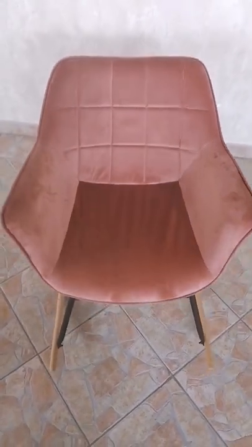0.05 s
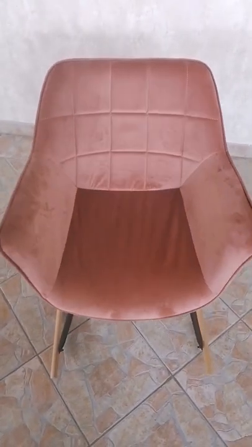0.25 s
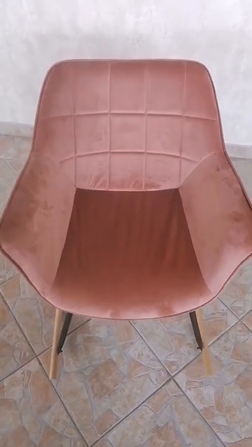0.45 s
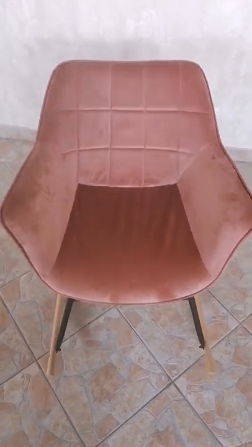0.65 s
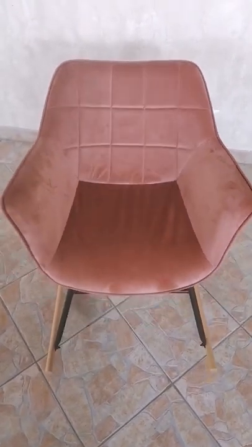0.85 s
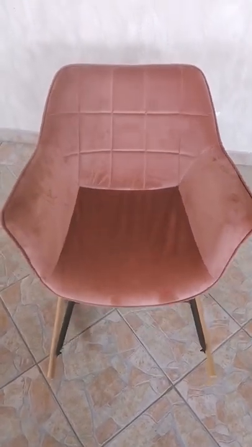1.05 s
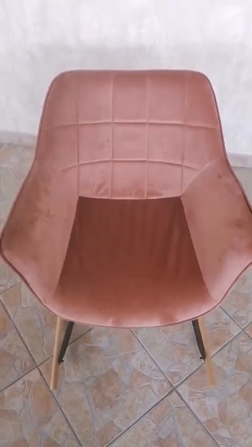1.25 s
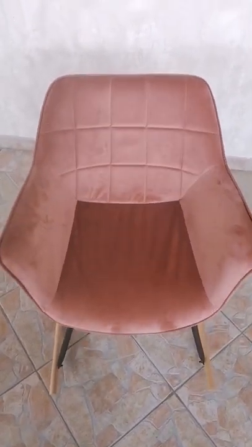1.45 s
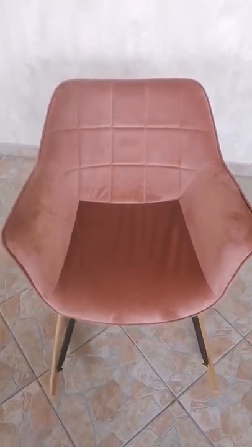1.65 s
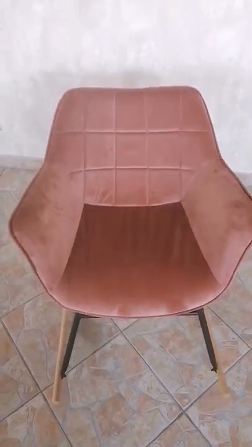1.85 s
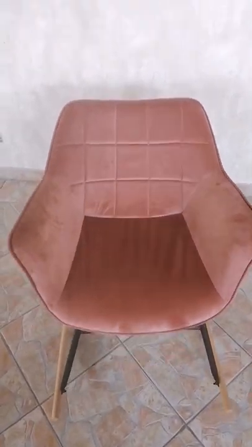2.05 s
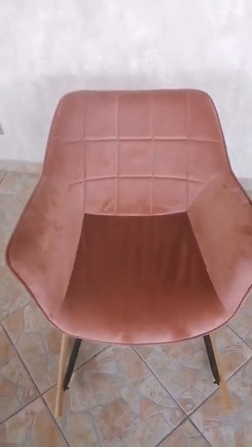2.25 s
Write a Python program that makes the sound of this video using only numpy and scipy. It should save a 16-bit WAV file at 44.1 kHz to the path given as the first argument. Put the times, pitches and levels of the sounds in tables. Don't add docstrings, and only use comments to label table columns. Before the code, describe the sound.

A chair rocks on rough tiles, close by in a small quiet room. After near silence, dull woody knocks cluster from 0.25 to 0.45 seconds, then pause. Heavier low thuds come around 0.8 to 1.0, more knocks at 1.2 to 1.55, and a hard cluster near 1.9, with a last bump at 2.25. Deep hums swell beneath, with faint hiss and slight cloth rustle and ticks late on.

```python
import sys
import numpy as np
from scipy import signal
from scipy.io import wavfile
from scipy.ndimage import uniform_filter1d

SR = 44100
rng = np.random.default_rng(int(sys.argv[2]) if len(sys.argv) > 2 else 0)


def generate_wav(sig):
    pcm = np.round(np.clip(np.atleast_2d(sig).T, -1, 1) * 32767).astype(np.int16)
    wavfile.write(sys.argv[1], SR, pcm)


def volts_from_decibels(level):
    exponent = np.asarray(level, float) / 20
    return 10 ** exponent


N = 101429

# (t/s, deep note level/dB, upper note level/dB)
SHELL_SWAY = [(0, -69, -53), (.05, -82, -78), (.17, -61, -67), (.21, -56, -67), (.25, -56, -56.5),
              (.3, -45, -51.5), (.45, -37.5, -44), (.74, -47, -63.5), (.95, -36.5, -80),
              (1.02, -43.5, -54.5), (1.24, -47.5, -72), (1.31, -57, -61), (1.54, -32.5, -43.5),
              (1.8, -45, -65), (1.97, -42.5, -63), (2.05, -48.5, -79), (2.1, -72, -78), (2.27, -56, -74)]
# (t/s, left over right/dB)
SWAY_PAN = [(0, 1), (.45, 1), (.7, 4.5), (.95, -0.5), (1.25, 0.5), (1.6, 2), (1.9, -1.5), (2.3, -2)]
# (t/s, level/dB)
BOARD_NOTE = [(0, -49.5), (.17, -81), (.3, -54), (.34, -49.5), (.44, -42), (.5, -66), (.56, -56),
              (.7, -98.5), (.82, -56), (.88, -33.5), (.928, -47.5), (.98, -45.5), (1.1, -55.5),
              (1.2, -72.5), (1.38, -58), (1.45, -46), (1.55, -56), (1.77, -69),
              (1.83, -51.5),
    (1.87, -53.5),
    (1.92, -41),
    (2.02, -61.5),
    (2.12, -74),
    (2.2, -90),
    (2.27, -65),
]
# (f/Hz, level/dB)
HISS_SPECTRUM = [(150, -11), (700, -11.5), (1300, -17), (3000, -20.5), (3600, -22.5), (7600, -29.5),
                 (8400, -36), (15400, -38.5)]
# (f/Hz, correlation)
HISS_LIKENESS = [(200, 0.98), (600, 0.11), (3000, 0.048), (7000, 0.074), (10000, 0.02), (13000, 1)]
# (f/Hz, left over right/dB)
HISS_TILT = [(300, -1), (1500, -1), (5000, .5), (9000, -6), (14000, -.5)]
# (t/s, level/dB)
ROLL_PRESSURE = [(0, -51), (.12, -78.5), (.2, -51), (.27, -61), (.3, -43), (.45, -58.5), (.52, -98),
                 (.72, -66), (.87, -41), (1.05, -60.5), (1.16, -70), (1.24, -50), (1.31, -57.5),
                 (1.43, -42.5), (1.58, -63), (1.74, -80.5), (1.92, -40), (2.14, -73)]
# (t/s, frame level/dB, board re frame/dB, runners re frame/dB)
RIDGES = [(.004, -61.5, 4, 1.5), (0.184, -62, -14, 11.5), (0.25, -57, 13, -3), (0.287, -47, 0.5, 4),
          (0.329, -46, 8.5, 0), (0.363, -47.5, -6, 2), (0.401, -50, -7, 3), (0.43, -60, -3, -9),
          (0.755, -55.5, -10, -7.5), (0.804, -43.5, 3.5, 1), (.845, -44, -6, 0.5), (0.863, -38.5, -14, -22),
          (0.907, -47.5, -5, -10), (.96, -43.5, 2, -9), (1.03, -54.5, -6, -18), (1.219, -52.5, -15, -8),
          (1.322, -43.5, -2.5, 4), (1.368, -47.5, -12, 4), (1.407, -45.5, -9, -10), (1.458, -47, -19, -9.5)]
# (t/s, frame level/dB, board re frame/dB, runners re frame/dB)
LATE_RIDGES = [
    (1.568, -50.5, -1, -39),
    (1.774, -52.5, -22, 2.5),
    (1.831, -50, -8, -2),
    (1.88, -41.5, 4, 0.5),
    (1.9, -41, -4, -11),
    (1.917, -40.5, -22, -36),
    (1.95, -59, -13, -4),
    (2.029, -48.5, -8, -6.5),
    (2.243, -50.5, -5, -0.5),
]
# (f/Hz, level/dB, t60/s, left-right phase/rad, left over right/dB)
BOARD_MODES = [(40.4, -9, 0.13, 0.55, 3.5), (106.2, -10, 0.17, 0.033, -8), (159.5, -6, 0.25, 0.028, -1)]
# (f/Hz, level/dB, t60/s, left-right phase/rad, left over right/dB)
FRAME_MODES = [(199.8, -13, 0.31, 0.1, 1.5), (215, -16.5, 0.23, 0.2, 0), (269, -9.5, 0.16, 0.11, -1.5),
               (292.5, -7, 0.064, 0.16, -6), (348.1, -11.5, 0.18, 0.47, -6),
               (382.6, -12.5, 0.24, 0.67, -3.5), (427.2, -10.5, 0.091, 0.69, -10.5)]
# (f/Hz, level/dB, t60/s, left-right phase/rad, left over right/dB)
RUNNER_MODES = [(466, -13.5, 0.1, 0.69, 0.7), (575.5, -6, 0.095, 1.66, 0.63), (683, -11, 0.063, 1.1, .5),
                (761.7, -9.5, 0.087, 2.04, 1), (882, -14.5, 0.067, 0.92, -1.2),
                (1168, -6, 0.024, 1.2, -1.4), (1733, -25, 0.087, 1.3, -1), (2373, -21, 0.039, 1.8, -1)]
# (f/Hz, t60/s)
ROOM_T60 = [(100, 0.82), (500, 0.17), (3000, 0.26)]
# (t/s, peak level/dB, f/Hz, t60/s)
CAUGHT_MODES = [(0.141, -62, 350.3, 0.19), (.184, -60.5, 477, 0.24), (0.193, -56.5, 344, 0.23),
                (.289, -53, 573, 0.16), (.295, -57, 307, 0.11), (0.322, -40.5, 148, 0.097),
                (.335, -52, 331, 0.11), (.355, -57, 597, 0.067), (0.371, -51, 254.6, 0.2),
                (.375, -53, 360.5, 0.18), (.397, -45, 365, 0.13), (0.426, -49, 262.4, .1),
                (0.459, -62, 375, 0.068), (.735, -59, 288, 0.25), (0.8, -43, 123, 0.2),
                (0.813, -55.5, 415, 0.15), (.842, -52.5, 547, 0.13), (0.844, -63, 1154, 0.14),
                (.86, -46, 410, 0.1), (.866, -42.5, 280, 0.13), (.866, -45, 198, .12),
                (0.902, -48, 294, 0.047), (.95, -44.5, 288, 0.098), (0.983, -52.5, 353.3, 0.29),
                (1.216, -59, 477, 0.14), (1.264, -57.5, 340, 0.16), (1.323, -54.5, 578, 0.25),
                (1.324, -54, 320, 0.19), (1.375, -54.5, 560, 0.12), (1.387, -47, 264, .2),
                (1.395, -55, 343, 0.14), (1.427, -46.5, 349, 0.17), (1.456, -52, 354, 0.094),
                (1.488, -47, 344, 0.086), (1.531, -59.5, 368, 0.21), (1.549, -55.5, 275.5, 0.14),
                (1.769, -59, 293, 0.16), (1.811, -46, 148, 0.14), (1.852, -56.5, 605, 0.16),
                (1.854, -53, 368, .1), (1.883, -51, 585, 0.15), (1.886, -46.5, 195, 0.24),
                (1.898, -47, 421, 0.14), (1.911, -38.5, 262.6, 0.097), (1.993, -43, 150, 0.14),
                (2.0, -41, 269, 0.083), (2.022, -48.5, 352.6, 0.13), (2.06, -60, 351.5, 0.33),
                (2.244, -57, 262, 0.17), (2.255, -51, 152, 0.11)]
# (peak t/s, rise/s, fall/s, level/dB, centre f/Hz, width/Hz)
BRUSHES = [
    (.848, .003, 0.066, -70.5, 1960, 1100),
    (1.91, 0.15, 0.18, -71, 2220, 2500),
    (1.93, 0.13, 0.19, -88, 10600, 3400),
    (2.17, 0.023, 0.081, -87, 10500, 1600),
    (2.165, 0.028, 0.067, -78, 5400, 6000),
]
# (t/s, level/dB, centre f/Hz, width/Hz)
CLOTH_TICKS = [
    (1.9, -62, 2800, 2000),
    (2.123, -70, 10500, 2500),
    (2.138, -70, 10500, 4000),
    (2.158, -60, 5500, 5000),
    (2.159, -68, 10600, 2500),
]

DEEP_HZ, UPPER_HZ, BOARD_HZ = 49.86, 75.05, 145.9
SHELL_WANDER_HZ, BOARD_WANDER_HZ = 0.89, 4
SWAY_LAG_RAD = 0.2
HISS_DB, RUMBLE_DB, RUMBLE_TOP_HZ = -73.5, -65, 161
GRIT_PER_S, GRIT_SPREAD_DB, GRIT_DB = 420, 3.5, -4
RIDGE_DB, UNEVEN_DB = -4.5, 1
RISE_S = 0.0036
SNAP = 1.44
NEIGHBOUR, SPLIT = 0.49, 0.0685
THUD_DB, THUD_HZ = -3.5, 278
ROOM_DB, ROOM_MONO_HZ = -13, 320
CATCH_RISE_CYCLES, CATCH_LAG_RAD, CATCH_PAN_DB = 2.73, 0.68, -3
WIDE_FROM_HZ = 317
DUCK_SHARE, DUCK_FROM_DB = 0.12, -57


def evened(x):
    return x / np.sqrt(np.mean(x ** 2) + 1e-20)


def read(points, hz):
    f, value = np.transpose(points)
    return np.interp(np.log(hz + 1), np.log(f + 1), value)


def curve(table, column=1):
    rows = np.array(table)
    return np.interp(np.arange(N) / SR, rows[:, 0], rows[:, column])


def band(x, hz, width_hz):
    return signal.lfilter(*signal.iirpeak(min(hz, SR / 2.2), hz / width_hz, SR), x)


def seat():
    out = np.zeros((2, N))
    notes = [(DEEP_HZ, SHELL_WANDER_HZ, curve(SHELL_SWAY), curve(SWAY_PAN)),
             (UPPER_HZ, SHELL_WANDER_HZ, curve(SHELL_SWAY, column=2), 0.3),
             (BOARD_HZ, BOARD_WANDER_HZ, curve(BOARD_NOTE), -0.5)]
    for hz, wander_hz, db, pan_db in notes:
        drift = uniform_filter1d(rng.standard_normal(N), size=3000)
        wander = evened(uniform_filter1d(drift, size=3000))
        phase = 2 * np.pi * np.cumsum(hz + wander_hz * wander) / SR
        lag = SWAY_LAG_RAD * evened(np.gradient(wander[::-1]))
        level = np.sqrt(2) * uniform_filter1d(volts_from_decibels(db), size=700)
        left = volts_from_decibels(pan_db / 2) * np.sin(phase + lag / 2)
        right = volts_from_decibels(-pan_db / 2) * np.sin(phase - lag / 2)
        out += level * np.array([left, right])
    return out


def hiss():
    frames, hz = N // 256 + 5, np.fft.rfftfreq(1024, 1 / SR)
    a, b, c, d, patches = rng.standard_normal((frames, 513, 5)).T
    patches = uniform_filter1d(patches, size=14, axis=0)
    patches = evened(uniform_filter1d(patches, size=8, axis=1))
    flicker = evened(uniform_filter1d(rng.standard_normal(frames), size=3))
    flicker = np.minimum(flicker, 1)
    same = np.clip(read(HISS_LIKENESS, hz), -1, 1)[:, None]
    left = a + 1j * b
    right = same * left + np.sqrt(1 - same ** 2) * (c + 1j * d)
    z = np.array([left, right]) * (hz > 120)[:, None]
    z *= volts_from_decibels(read(HISS_SPECTRUM, hz)[:, None] + 1.4 * patches + 0.7 * flicker)
    tilt = read(HISS_TILT, hz)
    z *= volts_from_decibels(np.array([tilt, -tilt])[:, :, None] / 2)
    treble = signal.istft(z * (hz > 1000)[:, None], nperseg=1024, noverlap=768)[1]
    noise = signal.istft(z, nperseg=1024, noverlap=768)[1][:, :N]
    return volts_from_decibels(HISS_DB) * noise / treble.std()


def rumble():
    noise = rng.standard_normal((3, N))
    sos = signal.butter(2, [15, RUMBLE_TOP_HZ], "band", fs=SR, output="sos")
    return volts_from_decibels(RUMBLE_DB) * evened(signal.sosfilt(sos, noise[0] + 0.72 * noise[1:]))


def ring(drive, hz, t60, lag, pan_db):
    t, side = np.arange(SR // 2) / SR, np.array([[1], [-1]])
    taps = np.sin(2 * np.pi * hz * t + side * lag / 2)
    for way in (1, -1):
        off, twist = rng.uniform(0.31, 1.855), rng.uniform(-0.12, 1)
        near_hz = hz * (1 + way * SPLIT * off)
        taps = taps + NEIGHBOUR * np.sin(2 * np.pi * near_hz * t + side * lag * twist)
    shape = volts_from_decibels(side * pan_db / 2 - 60 * t / t60) * (1 - np.exp(-t / RISE_S))
    return signal.oaconvolve(drive[None], shape * taps, axes=1)[:, :N]


def runners():
    rows = np.array(RIDGES + LATE_RIDGES)
    at, out = np.round(rows[:, 0] * SR).astype(int), np.zeros((2, N))
    grain_db = GRIT_SPREAD_DB * np.minimum(rng.exponential(1, N), 4)
    grit = evened((rng.random(N) < GRIT_PER_S / SR) * volts_from_decibels(grain_db))
    grit = grit * volts_from_decibels(curve(ROLL_PRESSURE) + GRIT_DB) / np.sqrt(SR / 100)
    t = np.arange(SR // 10) / SR
    # modes, level re frame/dB, grit level/dB, scuff decay/s
    parts = [(BOARD_MODES, rows[:, 2], 1, 0.022),
             (FRAME_MODES, 0, 0, 0.022),
             (RUNNER_MODES, rows[:, 3], -3.5, 0.056)]
    for modes, rel_db, grit_db, scuff_s in parts:
        scuff = np.exp(-t / scuff_s) + SNAP * np.exp(-t / RISE_S)
        scuff = scuff / np.sqrt(scuff_s * SR / 2)
        for hz, db, t60, lag, pan_db in modes:
            uneven_db = UNEVEN_DB * rng.standard_normal(len(rows))
            ridges = np.zeros(N)
            ridges[at] = volts_from_decibels(rows[:, 1] + RIDGE_DB + rel_db + uneven_db)
            scuffs = signal.oaconvolve(ridges, scuff)[:N]
            dulling_db = 10 * max(np.log2(hz / 1000), 0)
            drive = grit * volts_from_decibels(grit_db - dulling_db) + scuffs
            out += volts_from_decibels(db) * ring(drive * rng.standard_normal(N), hz, t60, lag, pan_db)
    return out


def thuds():
    rows = np.array(RIDGES + LATE_RIDGES)
    blows = np.zeros(N)
    sign = rng.choice([-1.0, 1.0], len(rows))
    blows[np.round(rows[:, 0] * SR).astype(int)] = volts_from_decibels(rows[:, 1] + THUD_DB) * sign
    u = 2 * np.pi * THUD_HZ * np.arange(SR // 10) / SR
    pulse = u ** 3 * (4 - u) * np.exp(-u) / 2
    return signal.oaconvolve(blows, pulse)[:N]


def room(x):
    taps = np.zeros((2, SR // 2))
    at = np.arange(200, SR // 2 - 20, 20)
    at = at + rng.integers(0, 20, (2, len(at)))
    np.put_along_axis(taps, at, rng.choice([-1., 1.], at.shape), 1)
    hz, t, z = signal.stft(taps, SR, nperseg=512)
    decay = volts_from_decibels(-60 * t / read(ROOM_T60, hz)[:, None])
    tail = signal.istft(z * decay, SR, nperseg=512)[1]
    tail = tail / np.linalg.norm(tail[0])
    wet = volts_from_decibels(ROOM_DB) * signal.fftconvolve(x.mean(0)[None], tail, axes=1)[:, :N]
    low = signal.butter(2, ROOM_MONO_HZ, "low", fs=SR, output="sos")
    return wet - signal.sosfiltfilt(low, wet - wet.mean(0))


def catches():
    t, side, out = np.arange(SR // 2) / SR, np.array([[1], [-1]]), np.zeros((2, N + SR))
    for s, db, hz, t60 in CAUGHT_MODES:
        wide = side / (1 + (WIDE_FROM_HZ / hz) ** 6)
        swell = 1 - np.exp(-t * hz / CATCH_RISE_CYCLES)
        shape = volts_from_decibels(db + wide * CATCH_PAN_DB / 2 - 60 * t / t60) * swell
        lag = wide * CATCH_LAG_RAD / 2 * hz / WIDE_FROM_HZ
        start = rng.uniform(0, 2 * np.pi)
        at = round(s * SR)
        out[:, at:at + len(t)] += 2 * shape * np.sin(2 * np.pi * hz * t + lag + start)
    return out[:, :N]


def cloth():
    t, out = np.arange(N) / SR, np.zeros((2, N))
    for s, rise, fall, db, hz, width_hz in BRUSHES:
        shape = np.exp(-((t - s) / np.where(t < s, rise, fall)) ** 2)
        noise = rng.standard_normal((3, N))
        noise = hz / 5000 * noise[0] + noise[1:]
        out += volts_from_decibels(db) * shape * evened(band(band(noise, hz, width_hz), hz, width_hz))
    for s, db, hz, width_hz in CLOTH_TICKS:
        noise = rng.standard_normal(N) + 0.4 * rng.standard_normal((2, N))
        snap = noise * (t >= s) * np.exp(-np.maximum(t - s, 0) / 0.0025)
        tick = band(band(snap, hz, width_hz), hz, width_hz)
        out += volts_from_decibels(db) * np.sqrt(hz / width_hz) * tick
    return out


def scene():
    rolling = runners() + thuds() + catches()
    return seat() + hiss() + rumble() + rolling + room(rolling) + cloth()


def band_limit(x):
    return signal.sosfilt(signal.butter(12, 15200, fs=SR, output="sos"), x)


def record(dry):
    cut = signal.sosfilt(signal.butter(1, 20, "high", fs=SR, output="sos"), dry)
    power = abs(uniform_filter1d((cut ** 2).mean(0), size=4000))
    power_db = 10 * np.log10(power + 1e-12)
    duck_db = DUCK_SHARE * np.maximum(power_db - DUCK_FROM_DB, 0)
    return band_limit(cut / volts_from_decibels(duck_db))


dry = scene()
out = record(dry)
generate_wav(out)
```